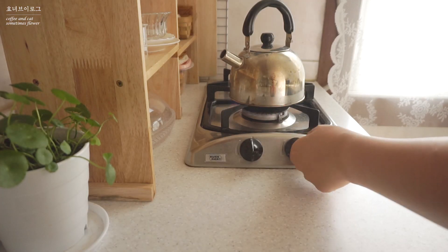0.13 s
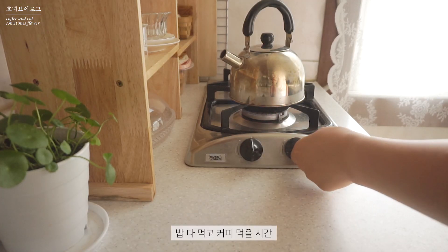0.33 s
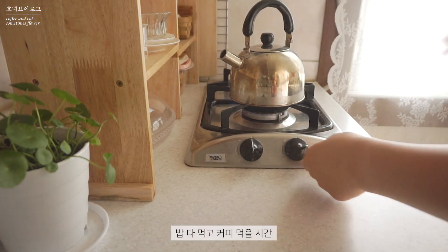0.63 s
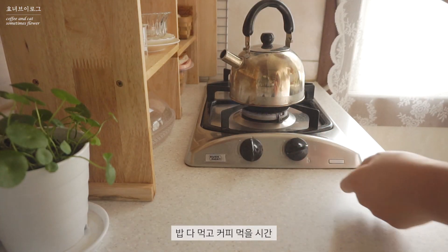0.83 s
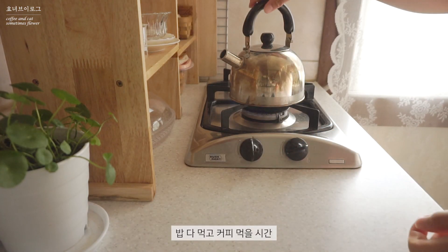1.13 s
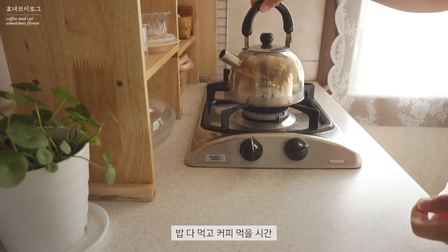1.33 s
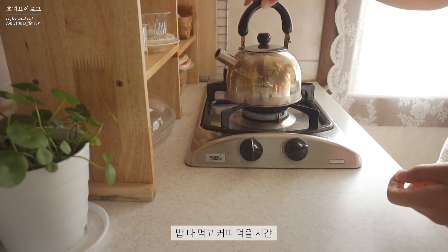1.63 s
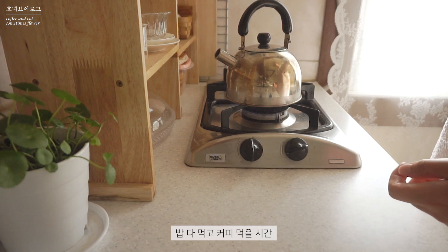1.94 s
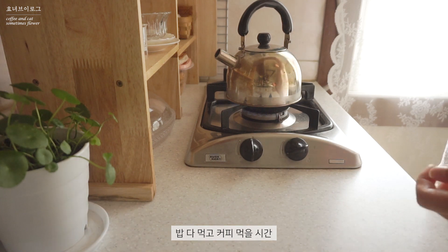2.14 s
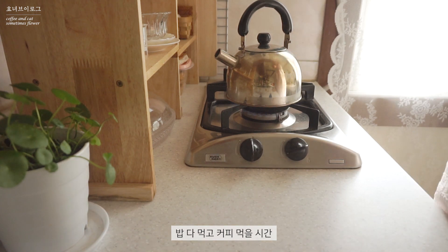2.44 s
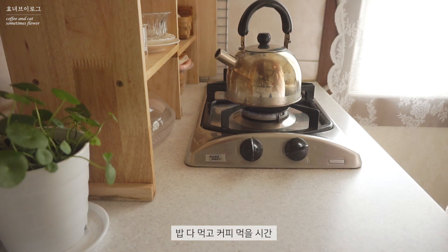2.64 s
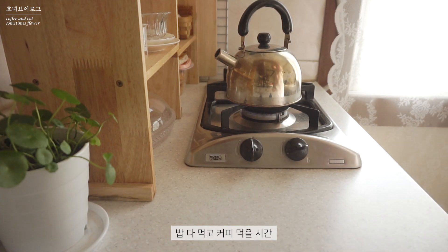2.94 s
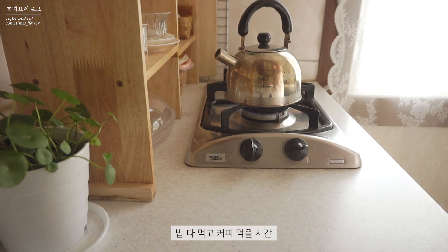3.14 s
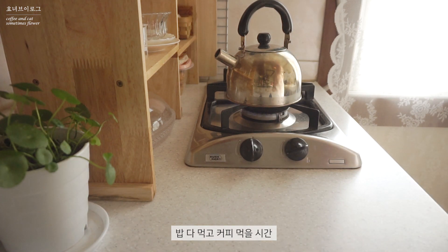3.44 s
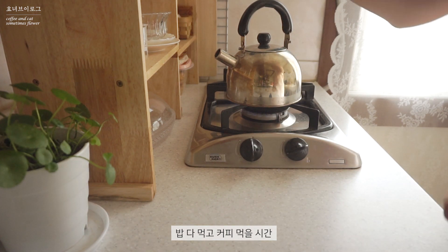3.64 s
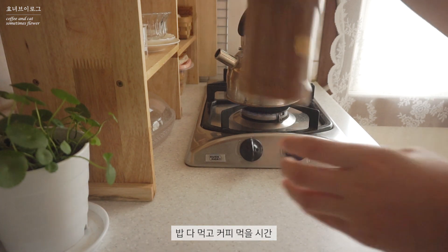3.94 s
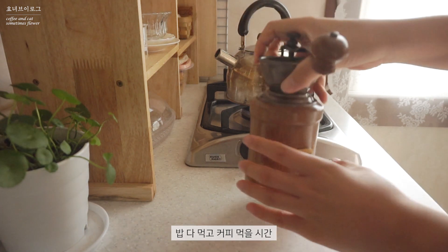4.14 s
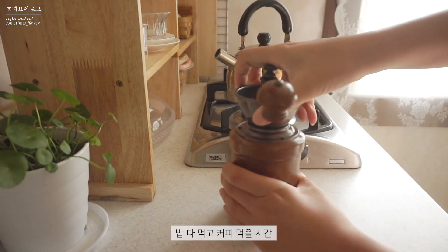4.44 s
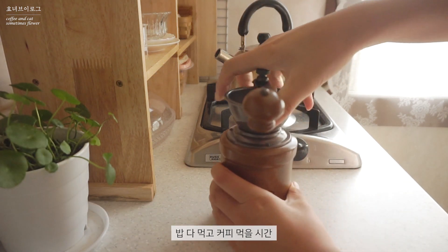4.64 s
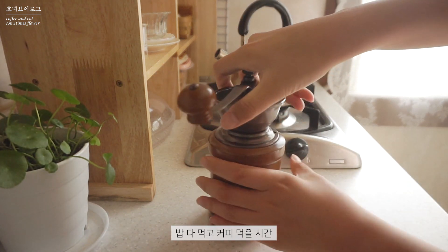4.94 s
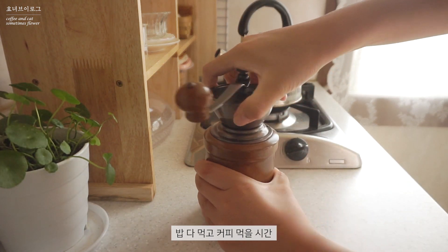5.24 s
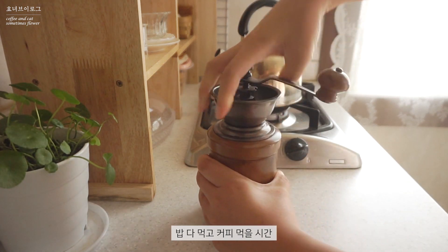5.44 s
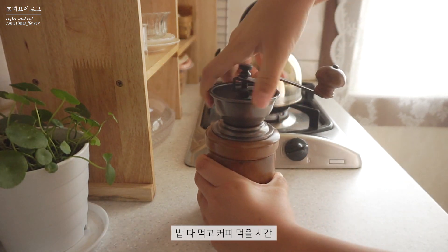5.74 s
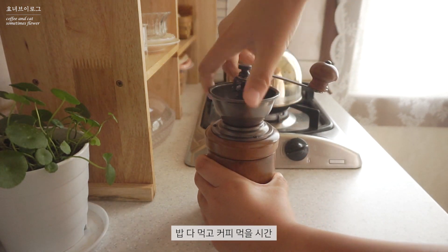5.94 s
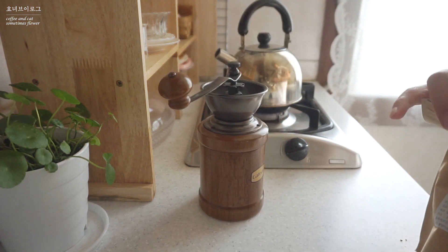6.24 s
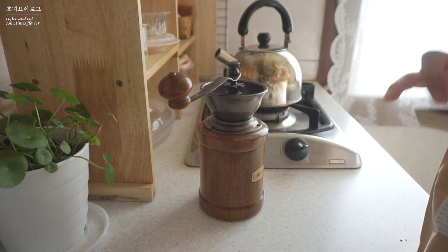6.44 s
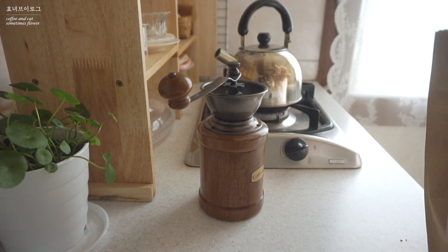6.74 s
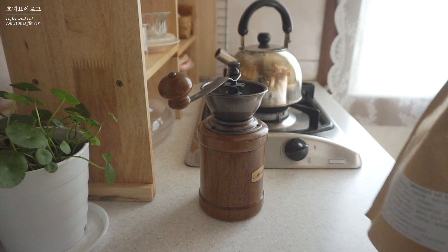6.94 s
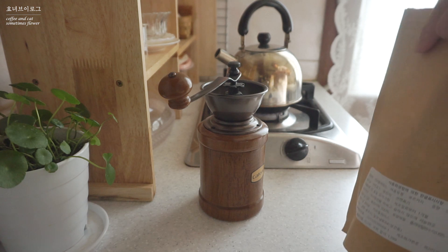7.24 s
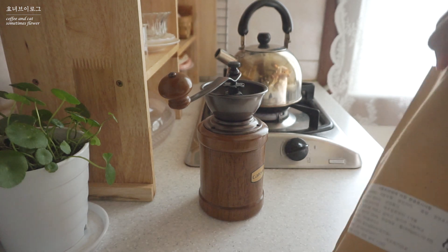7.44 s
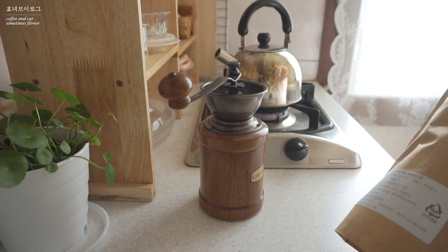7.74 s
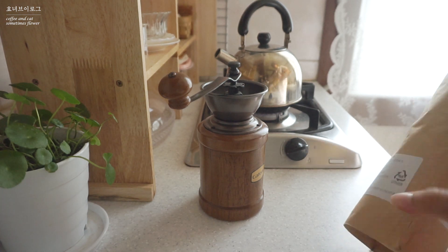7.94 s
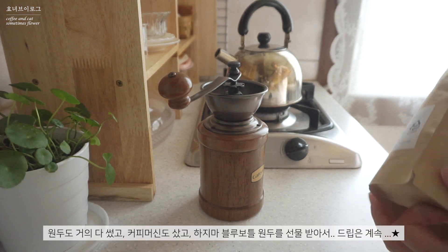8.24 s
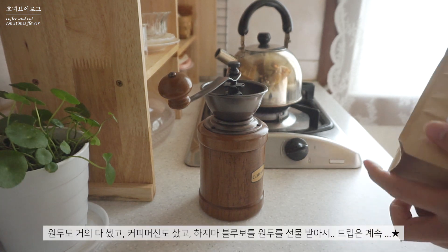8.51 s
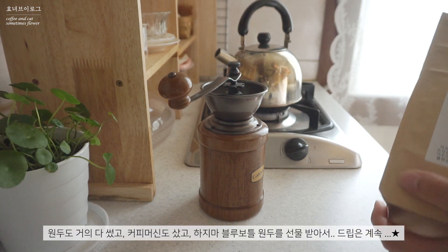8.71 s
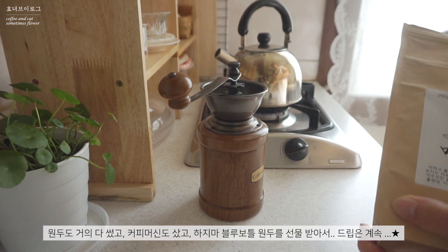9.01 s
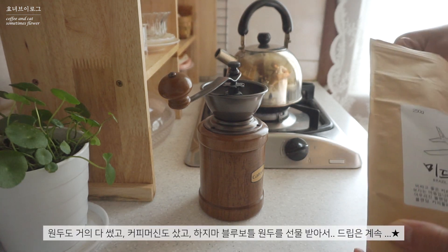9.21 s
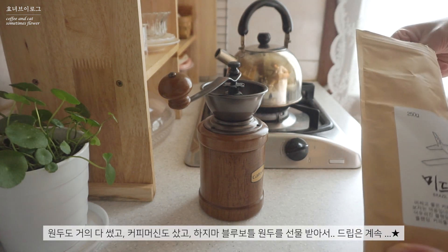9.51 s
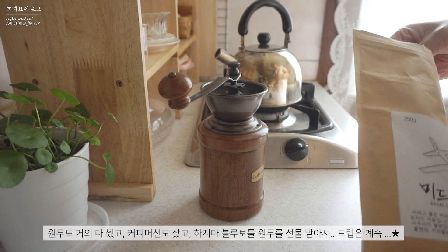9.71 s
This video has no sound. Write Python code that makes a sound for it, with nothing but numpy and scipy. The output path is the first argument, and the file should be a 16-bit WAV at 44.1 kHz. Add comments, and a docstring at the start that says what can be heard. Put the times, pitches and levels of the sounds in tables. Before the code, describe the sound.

Quiet kitchen: soft stove hiss, hollow wood knocks and thin metal ticks, then an abrupt cut to louder hiss and crisp paper bag crumpling.

```python
"""A gas flame hisses thinly under a kettle in a small kitchen, and something chirrs faintly far off. Hands
slide a wooden hand grinder; bubbles collapsing in the kettle join in with a hiss of their own. Wood knocks and
rings in decaying modes; the metal lid and crank tick and linger in thin tones. At 6.07 s the scene cuts to a
later moment with louder kettle hiss that covers the gas hiss: a stiff paper bag is unrolled close by, its
fibres slipping in clumps as rustle, its creases snapping at pitches of their own."""
import sys
import numpy as np
from scipy import signal
from scipy.fft import rfft, irfft, next_fast_len
from scipy.io import wavfile
from scipy.ndimage import map_coordinates

SR = 44100
rng = np.random.default_rng(int(sys.argv[2]) if len(sys.argv) > 2 else 0)


def log_audio(samples):
    """Write samples as a 16-bit WAV file to the path given in sys.argv[1]."""
    # one column per channel
    frames = np.atleast_2d(samples).T
    # limit to full scale, then quantise
    limited = np.clip(frames, -1, 1)
    pcm = np.round(limited * 32767).astype(np.int16)
    wavfile.write(sys.argv[1], SR, pcm)


N = 435266
SIZE = next_fast_len(N + SR)
HZ = np.maximum(np.fft.rfftfreq(SIZE, 1 / SR), 1)

# squeezes of the bag; the first row is a faint hiss just after the scene cut:
# peak_s, rel_peak_db, rise_s per 20 dB, fall_s per 20 dB, rel_treble_db
CRUMPLE_STROKES = [(6.1, -43, .03, 0.49, 0), (6.59, -23, 0.048, 0.16, -16), (6.81, -29.5, 0.23, 0.038, -6),
                   (6.92, -19.5, 0.063, 0.2, -5.5), (7.26, -40.5, .3, 0.2, -9),
                   (7.4, -26.5, 0.018, 0.97, -4.5), (7.52, -20.5, 0.096, 0.23, -8),
                   (7.65, -26.5, .15, .1, -10), (8.19, -27, 0.54, 0.12, -7), (8.28, -26, 0.025, 0.2, -12),
                   (8.38, -24.5, 0.14, 0.25, -22), (8.54, -23, 0.11, .2, 2),
                   (8.6, -19.5, 0.11, 0.023, -2.5), (8.93, -25, 0.87, 0.35, -6.5),
                   (9.05, -31.5, 0.019, 0.039, -6), (9.3, -28, .24, .14, -15),
                   (9.47, -36.5, 0.028, 0.12, -20)]


def from_db(db):
    """Gain of a level in dB."""
    return 10 ** (np.asarray(db) / 20)


def rms_one(x):
    """Scaled to rms 1."""
    return x / np.sqrt(np.mean(x ** 2) + 1e-20)


def in_time(rows):
    """Level curve (s, dB) at every sample; silent outside it."""
    s, level_db = np.transpose(rows)
    return np.interp(np.arange(N) / SR, s, level_db, left=-200, right=-200)


def at_hz(points):
    """Spectrum (Hz, dB) as gains on the frequency grid, interpolated over log frequency."""
    hz, db = np.transpose(points)
    return from_db(np.interp(np.log(HZ), np.log(hz), db))


def body(spectrum, peaks, peaks_db):
    """Minimum-phase response of a broad spectrum plus resonances; white noise keeps rms 1."""
    power = at_hz(spectrum) ** 2
    for hz, width_hz, db in peaks:
        detuning = 2 * (HZ - hz) / width_hz
        power = power + from_db(db + peaks_db) ** 2 / (1 + detuning ** 2) ** 2
    # folding the cepstrum onto positive times makes the response causal
    cepstrum = irfft(np.log(power / np.mean(power)) / 2, SIZE)
    cepstrum[1:SIZE // 2] *= 2
    cepstrum[SIZE // 2 + 1:] = 0
    return np.exp(rfft(cepstrum))


def through(x, response):
    """Filters x by a frequency response."""
    return irfft(rfft(x, SIZE) * response, SIZE)[..., :N]


def split(x, hz):
    """The parts of x below and above a frequency."""
    low = signal.sosfilt(signal.butter(3, hz, "low", fs=SR, output="sos"), x)
    high = signal.sosfilt(signal.butter(3, hz, "high", fs=SR, output="sos"), x)
    return low, high


def drift(rate_hz):
    """Slow random wander of rms 1: noise through a double one-pole low-pass."""
    r = np.exp(-2 * np.pi * rate_hz / SR)
    noise = rng.standard_normal(N + SR)
    return rms_one(signal.lfilter([1], [1, -2 * r, r * r], noise)[SR:])


def wander(x, share):
    """Reads x at a slowly changing speed, so that every resonance glides up and down."""
    at = np.clip(np.cumsum(1 + share * drift(1.2)), 0, N - 1)
    return np.stack([map_coordinates(channel, [at], order=3) for channel in x])


def grains(per_s, spread_db):
    """Clicks at random times and of random sign, sizes spread exponentially in dB; rms 1."""
    size_db = spread_db * np.minimum(rng.exponential(1, N), 4)
    sizes = from_db(size_db) * rng.choice([-1, 1], N)
    return rms_one(sizes * (rng.random(N) < per_s / SR))


def dying_noise(t60_s, channels):
    """Response of exponentially decaying noise, energy 1 per channel."""
    tail = rng.standard_normal((channels, SR // 2)) * from_db(-60 * np.arange(SR // 2) / SR / t60_s)
    return rfft(tail / np.sqrt(np.sum(tail ** 2, axis=1, keepdims=True)), SIZE)


def ring(clicks, hz, t60_s):
    """Two-pole resonator: a unit click sets a decaying sine of about height 1 ringing."""
    r, w = from_db(-60 / (t60_s * SR)), 2 * np.pi * hz / SR
    return signal.lfilter([0, np.sin(w)], [1, -2 * r * np.cos(w), r * r], clicks + 1e-18)


def modes(s, db, tilt, table, luck_db):
    """Every blow strikes all modes with chance strengths, tilted bright or dull (dB per octave)."""
    out = np.zeros(N)
    chance_db = rng.normal(0, luck_db, (len(s), len(table)))
    for (hz, mode_db, t60_s), luck in zip(table, chance_db.T):
        clicks = np.zeros(N)
        strength_db = db + mode_db + tilt * np.log2(hz / 4000) + luck
        clicks[np.round(s * SR).astype(int)] = from_db(strength_db)
        out += ring(clicks, hz, t60_s)
    return out


def tones(rows, rise_s, waver_db):
    """Sines that swell, waver in level and die."""
    out, waver = np.zeros(N + SR), from_db(waver_db * drift(47))
    for s, hz, db, t60_s in rows:
        t = np.arange(round(min(t60_s, 1) * SR)) / SR
        swell = (1 - np.exp(-t / rise_s)) * from_db(db - 60 * t / t60_s)
        start = round(s * SR)
        out[start:start + len(t)] += swell * np.sin(2 * np.pi * hz * t)
    return out[:N] * waver


def strokes(rows, t):
    """Strokes rise and fall evenly in dB; the loudest sets level and treble share (dB) at times t."""
    span_db = 20  # rise and fall times are given over this span
    s, db, rise_s, fall_s, treble_db = np.transpose(rows)[:, :, None]
    levels_db = db - span_db * np.maximum((s - t) / rise_s, (t - s) / fall_s)
    return levels_db.max(axis=0), treble_db[levels_db.argmax(axis=0), 0]


def rubbed(rows, response, per_s, spread_db, lumpy_db, patchy_db, treble_hz, treble_db):
    """Clumped slips, each ringing a few cycles at a pitch of its own, into a body."""
    step, count = 20, 16  # samples per level step; pitches
    coarse = strokes(rows, np.arange(0, N, step) / SR)
    level_db, rel_treble_db = np.repeat(coarse, step, axis=1)[:, :N]
    slips = grains(per_s, spread_db) * from_db(level_db + lumpy_db * drift(7.3))
    pitches_hz = np.geomspace(120, 11000, num=count)
    dealt = rng.integers(0, count, N)
    patches = from_db(patchy_db * drift(21.5))
    rings = np.zeros(N)
    for k, hz in enumerate(pitches_hz):
        # the shifted patches let each pitch swell and fade in its own time
        voice = np.roll(patches, k * N // count) * slips * (dealt == k)
        rings += hz / SR * ring(voice, hz, 3.86 / hz)  # even power per Hz
    low, high = split(through(rings, response), treble_hz)
    return low + high * from_db(rel_treble_db + treble_db)


def struck(events, t60_s, response, bass_db, mid_db, treble_db):
    """Each blow is a click and a short dying chatter into a body, with its own bass and treble."""
    push, t = np.zeros((3, N + SR)), np.arange(SR // 8) / SR
    for s, db, low_db, high_db in events:
        chatter = rng.standard_normal(len(t)) * from_db(db - 60 * t / np.clip(t60_s, .004, .15))
        chatter *= 1 + 0.21 * np.exp(-t / 0.00061)  # the first contact is hardest
        chatter[0] = 2.4 * from_db(db)
        gains = from_db([[low_db + bass_db], [mid_db], [high_db + treble_db]])
        start = round(s * SR)
        push[:, start:start + len(t)] += gains * chatter
    low, mid, high = through(push[:, :N], response)
    bass = split(low, 440)[0]
    middle = split(split(mid, 392)[1], 3050)[0]
    treble = split(high, 3240)[1]
    return bass + middle + treble


def chirr():
    """Faint far chirring: a narrow band of noise, throbbing."""
    # start_s, level_db before the throb
    chirr_level = [(.33, -72), (.45, -70), (.8, -65), (.93, -69)]
    band_hz, throbs_per_s = (5840, 6840), 28
    band_filter = signal.butter(3, band_hz, "band", fs=SR, output="sos")
    band = signal.sosfilt(band_filter, rng.standard_normal(N))
    throb = np.sin(np.pi * throbs_per_s * np.arange(N) / SR + 1.0 * drift(6)) ** 2
    return rms_one(band) * throb * from_db(in_time(chirr_level))


def stove():
    """Gas jets hiss as shaped noise; bubbles collapsing on the kettle's floor ring it; mid and side."""
    # gas hiss, broad part: freq_hz, rel_db per Hz
    flame_spectrum = [(35, -54), (60, -13), (150, -11), (427, -13.5), (1110, -12.5), (1840, -19.5),
                      (3860, -18.5), (4210, 0), (4910, -22), (5600, -17), (7900, -25.5), (11000, -12),
                      (14300, -41), (22000, -120)]
    # burner jets whistling faintly: freq_hz, width_hz, rel_db
    jet_peaks = [(1150, 390, -7.5), (2485, 50, -15.5), (3020, 160, -12.5), (3470, 76, -15.5), (4264, 45, 1),
                 (5614, 130, -12), (7210, 85, -11), (8760, 110, -17.5), (9480, 60, -12), (10030, 150, -8),
                 (10766, 88, -7)]
    # kettle, broad part: freq_hz, rel_db per Hz
    kettle_spectrum = [(59, -68), (100, -20.5), (196, -37), (597, -14.5), (728, -16), (1020, -4),
                       (2000, -16), (2130, -16.5), (3640, -8.5), (6210, -6), (10600, -16), (11500, -8),
                       (15000, -57), (22000, -120)]
    # kettle resonances while only warm: freq_hz, width_hz, rel_db
    warm_peaks = [(3460, 38, 1), (3887, 106, 2.5), (4620, 310, -6.5), (5610, 130, -2), (6440, 280, -3),
                  (7820, 130, -13)]
    # shell resonances of the hot kettle: freq_hz, width_hz, rel_db
    hot_peaks = [(1040, 20, 4.5), (1270, 28, 5), (1996, 8.1, 2), (3663, 54, 2), (4170, 320, -2.5),
                 (4670, 27, 0), (6160, 74, -1.5), (6450, 57, -9), (7200, 60, -10.5), (7800, 63, -3),
                 (10010, 410, -10.5)]
    # hiss level, dipping after loud sounds: time_s, level_db
    hiss_level = [(1.6, -76), (1.78, -56), (2.5, -47.5), (2.73, -48.5), (2.91, -52), (4.4, -48),
                  (4.46, -57), (4.71, -53.5), (4.9, -49.5), (5.42, -46), (6.06, -44.5), (6.09, -36.5),
                  (6.76, -38), (6.99, -47.5), (7.27, -42), (8.9, -40.5), (9.09, -43), (9.87, -40)]
    # stereo spread: freq_hz, side_over_mid_db
    stove_width = [(60, -25), (220, -9), (830, -4), (3090, -4.5), (11500, -7)]
    cut = round(6.07 * SR)
    flame_floor_db, flame_follows, follow_above_db = -60, 0.57, -55

    wide = np.stack([np.ones_like(HZ), at_hz(stove_width)])
    gas = through(rng.standard_normal((2, N)), wide * body(flame_spectrum, jet_peaks, peaks_db=8.0))
    bubbles = np.stack([grains(9000, spread_db=-1.0) for channel in range(2)])
    warm = through(bubbles, wide * body(kettle_spectrum, warm_peaks, peaks_db=1.5))
    warm = wander(warm, share=.025)
    hot = through(bubbles, wide * body(kettle_spectrum, hot_peaks, peaks_db=3.5))

    heat = np.clip(.25 + .2 * drift(1.5), 0, 1)  # the colour wanders while the water warms
    heat[cut:] = 1
    water = (1 - heat) * warm + heat * hot
    flicker = from_db(.6 * drift(7))
    hiss_db = in_time(hiss_level)
    # flame follows part of these level changes
    flame = from_db(flame_floor_db + flame_follows * np.maximum(hiss_db - follow_above_db, 0))
    flame[cut:] = 0  # the gas hiss is left silent after the cut, lost under the louder kettle
    return flicker * (gas * flame + water * from_db(hiss_db))


def metal():
    """Lid and crank tick in their modes, each touch a few uneven bounces; lingering tones are added."""
    # touches: time_s, rel_peak_db, brightness_db_per_octave
    touches = [(2.8494, -35, -16), (2.8883, -29.5, -11), (3.1438, -21.5, -10.5), (3.1797, -36, -5),
               (3.8701, -51, 29.5), (3.9135, -21.5, 9), (5.5029, -17, 5.5)]
    # modes: freq_hz, rel_db, t60_s
    metal_modes = [(2410, -29, 0.081), (3030, -1.5, 0.014), (3370, -16, 0.033), (3940, -4.5, 0.01),
                   (6550, -5, 0.0062), (6880, -4.5, 0.014), (7700, -20, 0.03), (9000, -24, 0.023)]
    # lingering tones: thin metal ones, a hollow knock at 210 Hz, a low thud at 145 Hz:
    # start_s, freq_hz, level_db, t60_s
    lingering_tones = [(1.76, 2420, -61, 0.59), (2.85, 3460, -42, 0.35), (2.9, 2780, -48, 0.9),
                       (2.95, 2160, -58, 0.75), (3.04, 3410, -50, 0.5), (4.995, 210, -45, 0.37),
                       (5.52, 4450, -51, 0.73), (6.585, 145, -30, 0.16)]
    s, db, tilt = np.transpose(touches)
    spacing_s = np.array([0, .0023, .0051, .0094])[:, None]
    bounces_s = spacing_s * rng.uniform(0.49, 1.3, (len(s), 4)).T
    times_s = (s + bounces_s).ravel()
    levels_db = (db - 10.5 - 700 * bounces_s).ravel()  # later bounces are weaker
    ticks = modes(times_s, levels_db, np.tile(tilt, 4), metal_modes, luck_db=6.5)
    return split(ticks, 1500)[1] + tones(lingering_tones, rise_s=.008, waver_db=3.5)


def grinder():
    """Wood knocked and slid, metal touched; so small a body radiates no deep bass."""
    # wood, broad part: freq_hz, rel_db per Hz
    wood_spectrum = [(47, -38), (80, -4), (532, -5.5), (682, 2), (1190, -5.5), (2120, -15), (2400, -13.5),
                     (3200, -20), (7910, -24.5), (11000, -34.5), (14300, -43), (22000, -120)]
    # wood resonances: freq_hz, width_hz, rel_db
    wood_peaks = [(650, 140, 0), (991.5, 74, 1), (1170, 26, -0.5), (1590, 7.6, -1), (2550, 32, -10.5),
                  (2430, 140, -15)]
    # ringing after each knock, the room at 145 Hz, wood above: freq_hz, rel_db, t60_s
    knock_modes = [(145, -21, 0.44), (246, -19.5, 0.3), (366, -17.5, 0.087), (547, -16, 0.14),
                   (670, -2, 0.087), (786, -26, 0.063), (990, 1.5, 0.13), (1170, -28, 0.15),
                   (1297, 0, 0.095), (1596, -9, .04), (2510, -1.5, 0.012)]
    # knocks; the last row is the click at the scene cut: time_s, rel_peak_db, rel_bass_db, rel_treble_db
    knock_events = [(2.473, -26.5, -29, -9), (2.482, -24, -11.5, -4), (2.758, -14.5, -46, -36),
                    (2.777, -21, -37, 3), (2.827, -6, -7, -21), (2.888, -22, 4, -39),
                    (3.263, -18.5, -40, -32), (3.44, -15.5, -47, -40), (3.597, -17.5, -36, -30),
                    (3.791, -17, -12, -26.5), (4.426, -7, -51, -33), (4.672, -39.5, 4, -3.5),
                    (4.714, -29.5, -26, -14.5), (4.866, -32.5, -7, -30), (5.252, -32, -6, -5),
                    (5.493, -17, -2, -26), (5.732, -45.5, 15, 7.5), (5.755, -39.5, 2, 3),
                    (5.778, -27.5, -11, -9), (6.07, -25, -14, -15)]
    # hands slide, turn and rattle: peak_s, rel_peak_db, rise_s per 20 dB, fall_s per 20 dB, rel_treble_db
    slide_strokes = [(1.43, -46, 0.057, 0.28, 10), (1.535, -46.5, 0.21, 0.043, 8.5),
                     (2.474, -33.5, .002, 0.082, 6), (2.757, -27, .002, 0.094, 11),
                     (2.825, -25, 0.019, 0.11, -0.5), (2.94, -29, .2, 0.079, -11),
                     (4.427, -26, 0.0015, 0.073, 0), (4.5, -39.5, .05, 0.34, -19.5),
                     (5.057, -47, 1.17, 0.042, -18), (5.268, -31, .016, 0.11, 2),
                     (5.325, -34.5, 0.087, 0.066, 3.5), (5.44, -36.5, 0.19, .12, 8.5),
                     (5.488, -34, 0.075, 0.084, 9), (5.778, -32.5, 0.035, 0.14, -1),
                     (5.83, -33.5, 0.13, 0.091, 4.5)]
    wood = body(wood_spectrum, wood_peaks, peaks_db=2.5)
    slides = rubbed(slide_strokes, wood, 5000, spread_db=1.0, lumpy_db=3.0, patchy_db=2.0,
                    treble_hz=1700, treble_db=5.5)
    s, db = np.transpose(knock_events)[:2]
    knocks = struck(knock_events, 0.061, wood, bass_db=1.0, mid_db=-12, treble_db=11.5)
    ringing = modes(s, db - 19.5, 0, knock_modes, luck_db=4.5)
    return split(from_db(10.0) * slides + knocks + ringing + metal(), 189)[1]


def small_snaps():
    """Random small snaps, as strong as the crumpling at their moment allows."""
    count, over_stroke_db, treble_db = 60, 8.5, -25
    panel_hz, panel_octaves = 920, 0.385  # usual pitch, spread either way
    when, size, pitch = rng.random((count, 3)).T
    first_s, last_s = CRUMPLE_STROKES[0][0], CRUMPLE_STROKES[-1][0]
    s = first_s + when * (last_s - first_s)
    level_db = strokes(CRUMPLE_STROKES, s)[0] + over_stroke_db - 11.0 * size
    hz = panel_hz * 2 ** (panel_octaves * (2 * pitch - 1))
    return list(zip(s, level_db, np.full(len(s), treble_db), hz))


def bag():
    """Paper fibres slip in clumps; creases snap, each panel with a pitch of its own."""
    # paper, broad part: freq_hz, rel_db per Hz
    paper_spectrum = [(47, -56), (80, -31.5), (251, -27), (329, -18.5), (440, -19.5), (601, -3.5),
                      (911, -0.5), (1350, -9.5), (2520, -8), (3300, -11.5), (10200, -20), (11500, -21),
                      (15000, -73), (22000, -120)]
    # air and walls of the bag: freq_hz, width_hz, rel_db
    paper_peaks = [(904, 50, -3), (1617, 450, -5), (2112, 69, -3), (2472, 71, -3)]
    # clearest creases: time_s, rel_peak_db, rel_treble_db, pitch_hz
    clear_snaps = [(6.169, -22.5, -14, 1240), (6.389, -19.5, -3.5, 1270), (6.524, -19, -23, 1120),
                   (6.585, -12.5, -10, 850), (6.598, -13.5, -9, 712), (6.621, -9.5, -16.5, 870),
                   (6.768, -19, -18, 1240), (6.783, -14.5, -4, 2220), (6.888, -18, -7.5, 1000),
                   (6.906, -18.5, -4, 1400), (6.933, -13, -10.5, 1510), (6.973, -14.5, -23, 1170),
                   (7.208, -23.5, -26, 1120), (7.265, -17, -25, 1150), (7.389, -16.5, -20, 1110),
                   (7.514, -5.5, -17.5, 763), (7.589, -20.5, -9, 870), (7.637, -7.5, -18.5, 733),
                   (7.658, -21, 0, 630), (7.678, -15.5, -32, 670), (7.814, -12, -24, 678),
                   (7.849, -20, -17, 950), (7.912, -21.5, -21, 900), (7.97, -8.5, -11.5, 831),
                   (8.119, -15.5, -18, 920), (8.189, -9, -14, 2530), (8.276, -10, -8, 912),
                   (8.353, -12.5, -17, 1150), (8.378, -12.5, -5, 2600), (8.566, -12, -13, 920),
                   (8.587, -14, -25, 935), (8.78, -10.5, -22, 866), (8.887, -13, -24, 750),
                   (8.941, -15, -33, 904), (9.055, -5, -20.5, 910), (9.086, -22, -27, 886),
                   (9.164, -17, -30, 1010), (9.23, -11, -25, 961), (9.273, -15.5, -8.5, 1010),
                   (9.33, -14.5, -21, 896), (9.466, -14.5, -35, 1150)]
    snap_t60_s = 0.057
    paper = body(paper_spectrum, paper_peaks, peaks_db=-1.0)
    rustle = rubbed(CRUMPLE_STROKES, paper, 3000, spread_db=1.8, lumpy_db=1.5, patchy_db=2.0,
                    treble_hz=2860, treble_db=1.0)
    snaps = list(clear_snaps) + small_snaps()
    panel_rows = [(s, hz, db - 10.5, snap_t60_s * 0.92) for s, db, _, hz in snaps]
    panels = tones(panel_rows, rise_s=0.0007, waver_db=3.5)
    crack_rows = [(s, db, 0, treble_db) for s, db, treble_db, _ in snaps]
    cracks = struck(crack_rows, snap_t60_s, paper, bass_db=-10, mid_db=-11, treble_db=3)
    return from_db(11.5) * rustle + cracks + panels


def scene():
    """Near reflections differ at the two ports and change as the hands move; the room adds a short tail."""
    # near reflections: freq_hz, side_over_mid_db
    hands_width = [(60, -12), (190, -9), (620, -31), (1110, -4.5), (2000, -1.5), (3580, -1), (11500, -4)]
    # colour of the room tail: freq_hz, rel_db
    room_colour = [(90, -25), (145, -15), (220, -19), (345, 10), (550, 3), (1500, -2.5), (4000, 4),
                   (11000, 6)]
    room_db, room_t60_s, turns_per_s = -10, 0.29, 0.583
    wooden, paper = grinder(), bag()
    hands = wooden + paper

    # four sets of reflections take turns
    turn = 2 * np.pi * (np.arange(N) / SR * turns_per_s + np.arange(4)[:, None] / 4)
    places = np.maximum(np.cos(turn), 0)
    reflections = dying_noise(0.019, channels=4) * at_hz(hands_width)
    side = through(hands * places, reflections).sum(axis=0)
    room = dying_noise(room_t60_s, channels=2) * at_hz(room_colour) * from_db(room_db)
    tail = through(hands, room)

    hiss, hiss_side = stove()
    left_of_centre = wooden * from_db([[1.2], [-1.2]]) + hiss * from_db([[.6], [-.6]])
    return left_of_centre + paper + chirr() + (side + hiss_side) * [[1], [-1]] + tail


def record(dry):
    """The microphone drops the deep bass; a steep low-pass cuts the top."""
    cutoff_hz = 11040
    thin = signal.sosfilt(signal.butter(3, 100, "high", fs=SR, output="sos"), dry)
    return signal.sosfilt(signal.ellip(12, .3, 55, cutoff_hz, fs=SR, output="sos"), thin)


dry = scene()
out = record(dry)
log_audio(out)
```